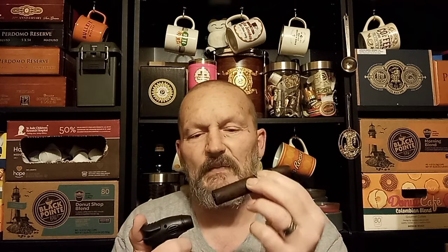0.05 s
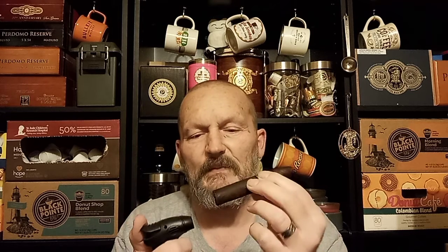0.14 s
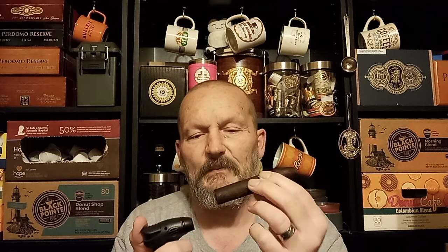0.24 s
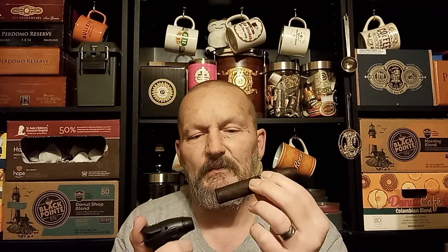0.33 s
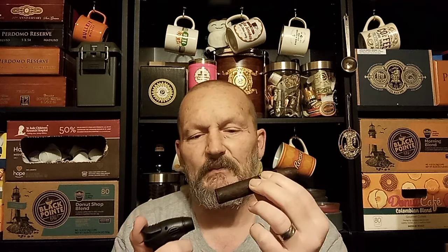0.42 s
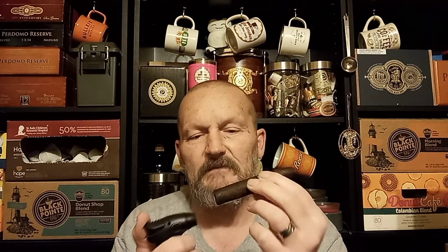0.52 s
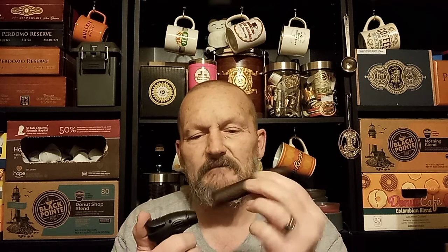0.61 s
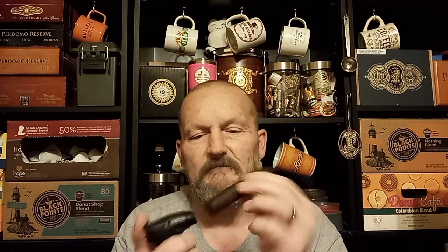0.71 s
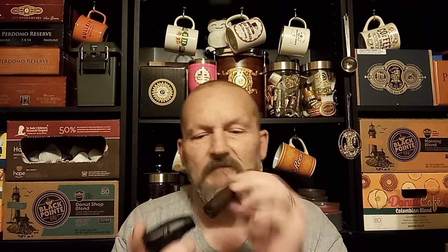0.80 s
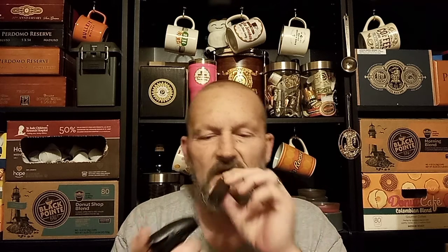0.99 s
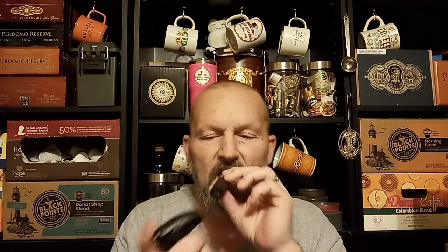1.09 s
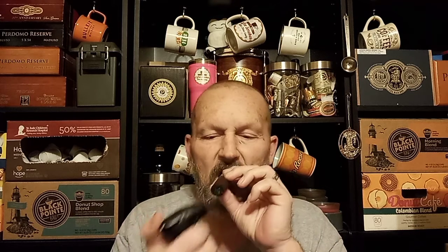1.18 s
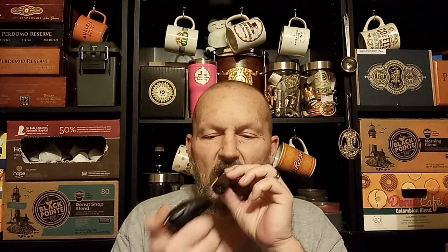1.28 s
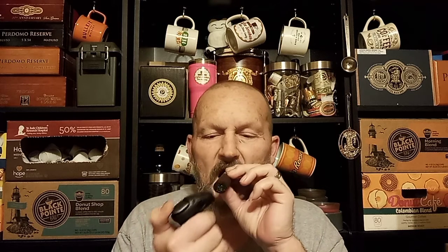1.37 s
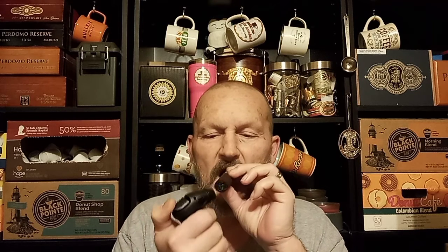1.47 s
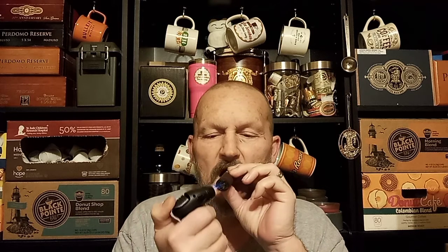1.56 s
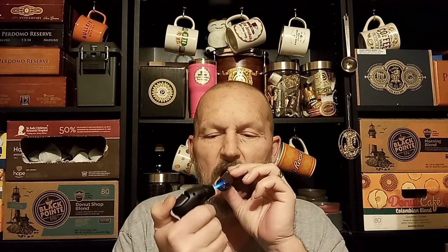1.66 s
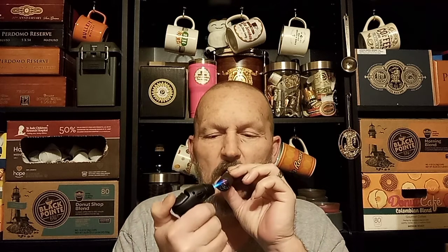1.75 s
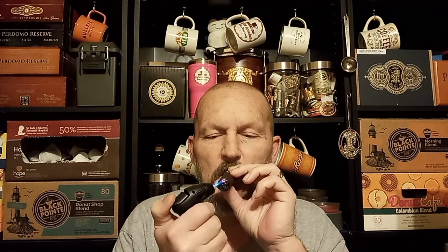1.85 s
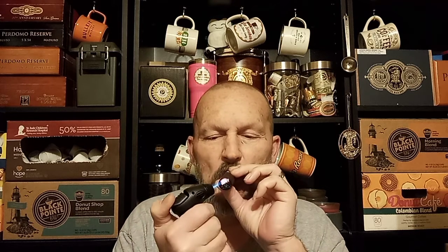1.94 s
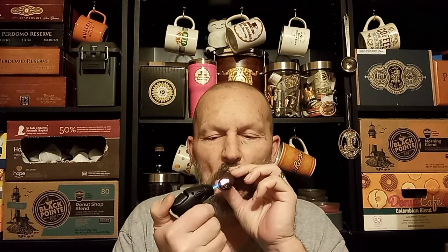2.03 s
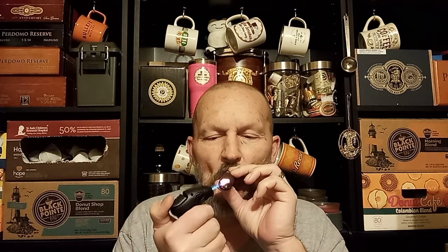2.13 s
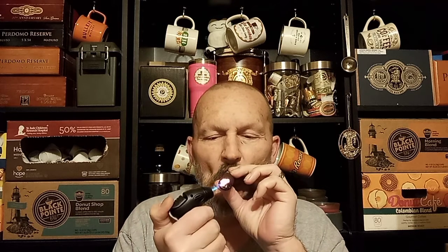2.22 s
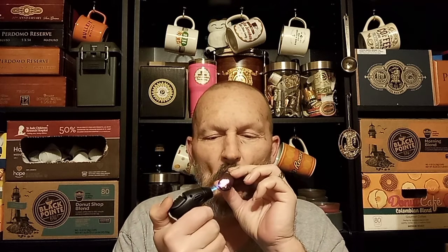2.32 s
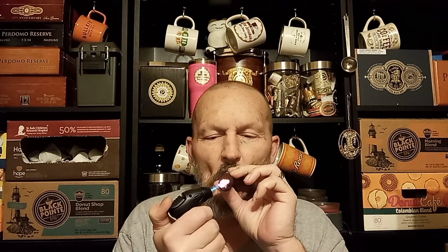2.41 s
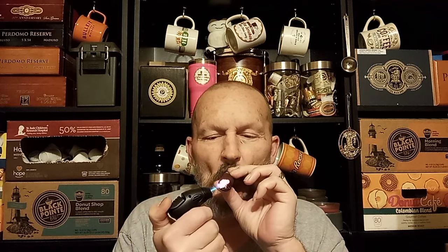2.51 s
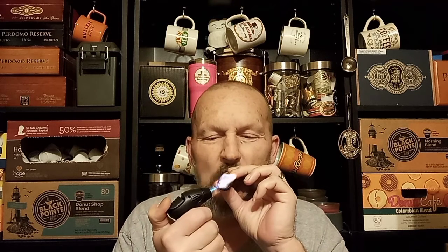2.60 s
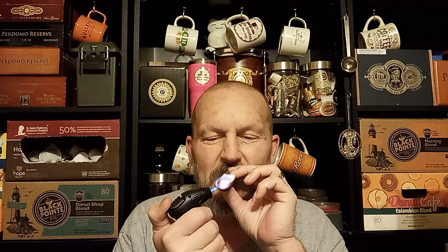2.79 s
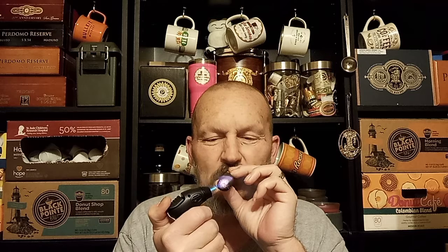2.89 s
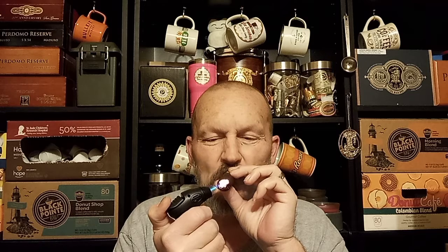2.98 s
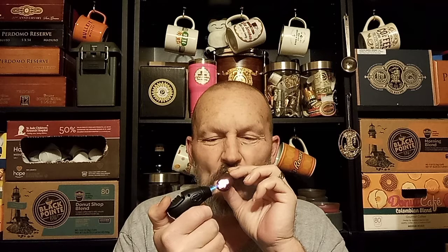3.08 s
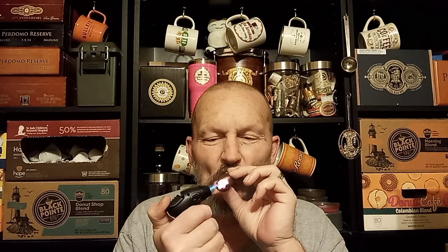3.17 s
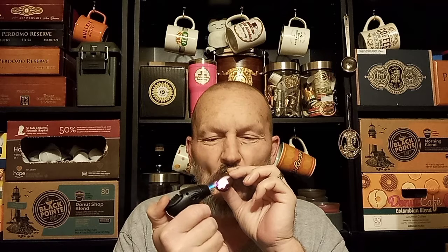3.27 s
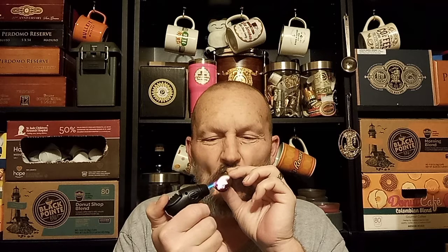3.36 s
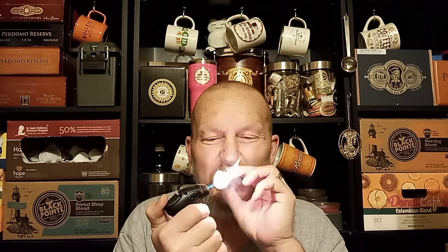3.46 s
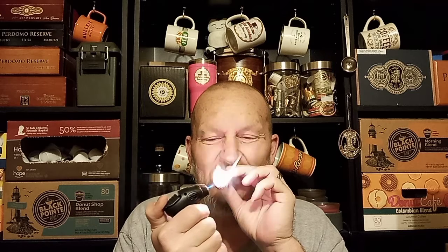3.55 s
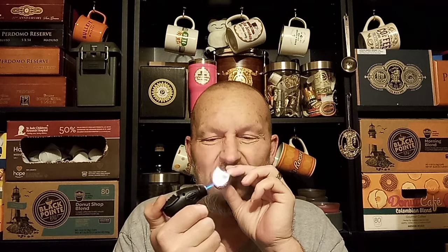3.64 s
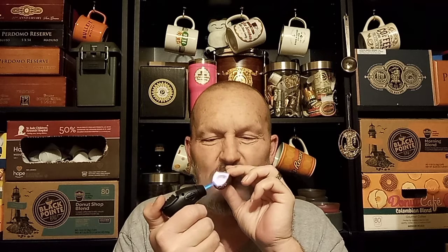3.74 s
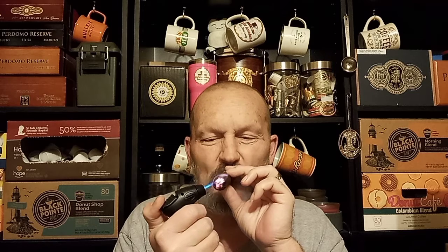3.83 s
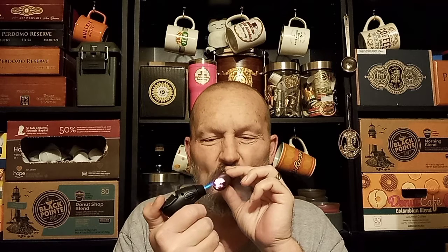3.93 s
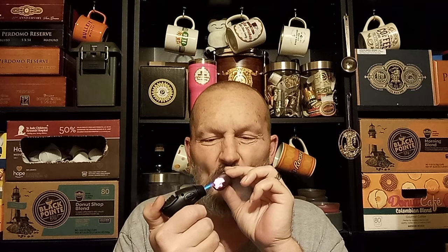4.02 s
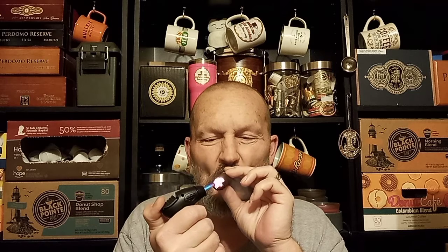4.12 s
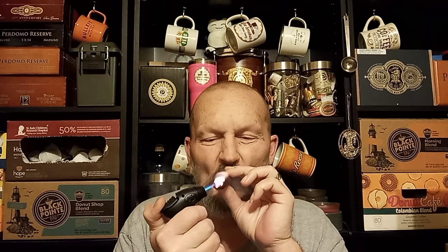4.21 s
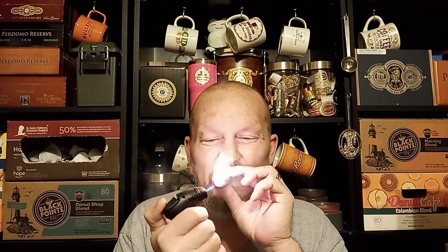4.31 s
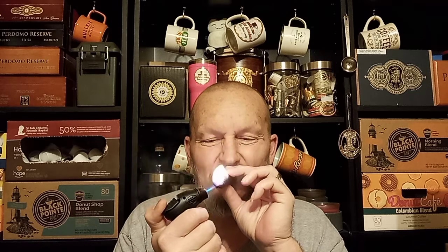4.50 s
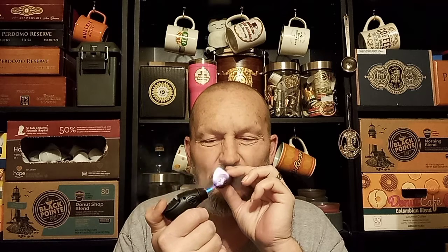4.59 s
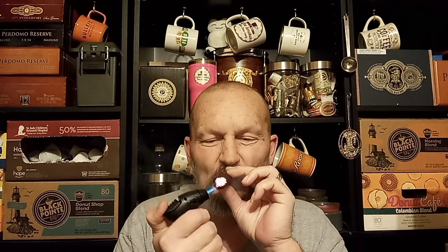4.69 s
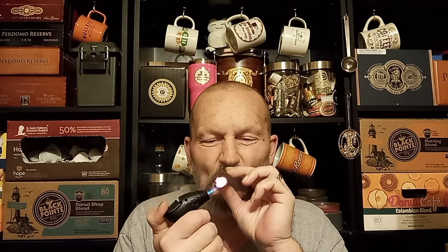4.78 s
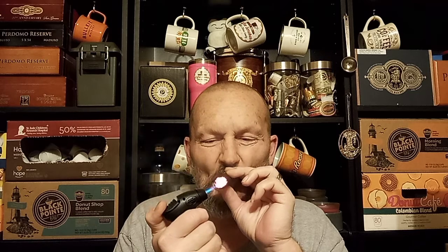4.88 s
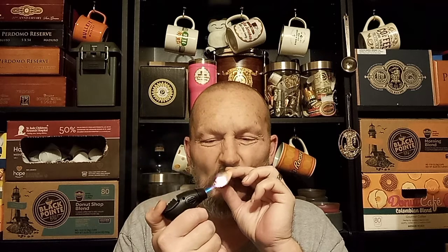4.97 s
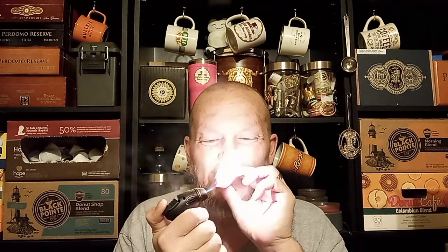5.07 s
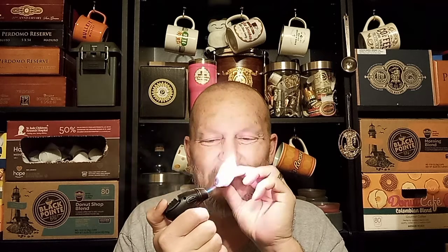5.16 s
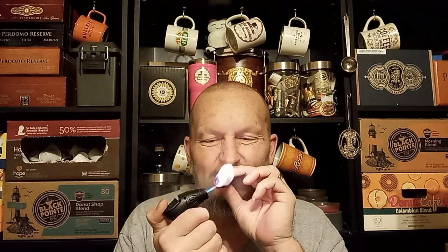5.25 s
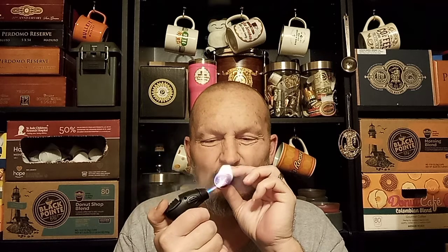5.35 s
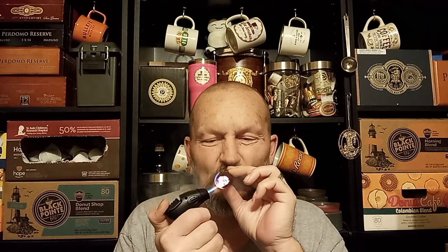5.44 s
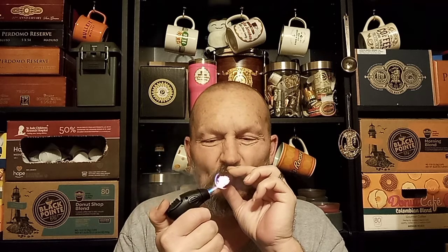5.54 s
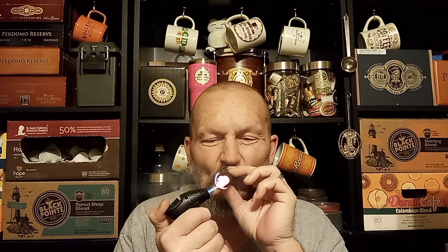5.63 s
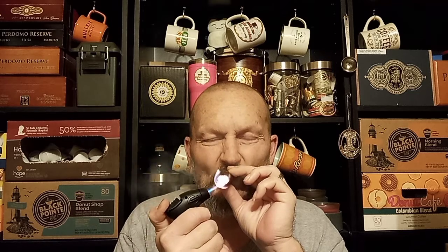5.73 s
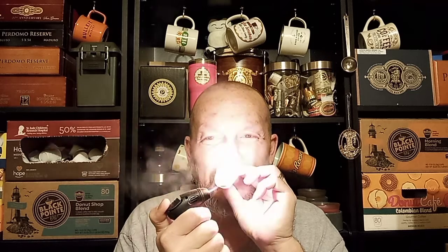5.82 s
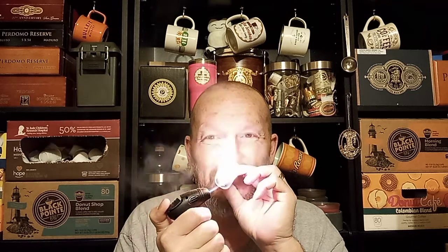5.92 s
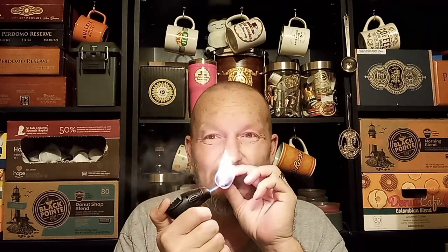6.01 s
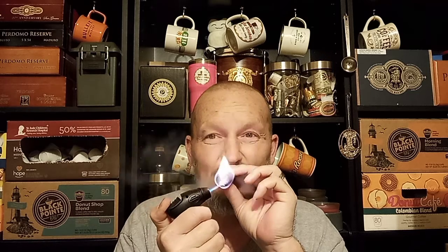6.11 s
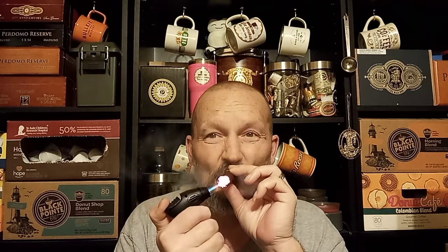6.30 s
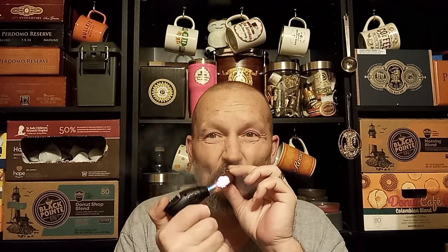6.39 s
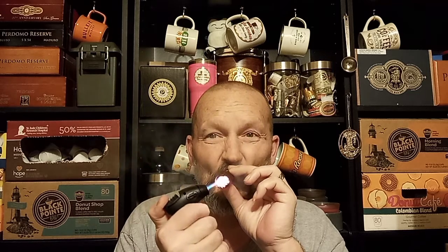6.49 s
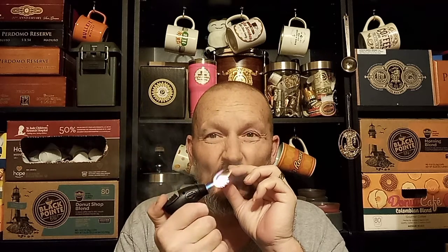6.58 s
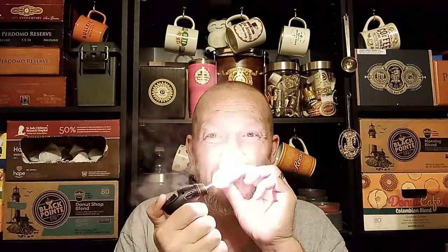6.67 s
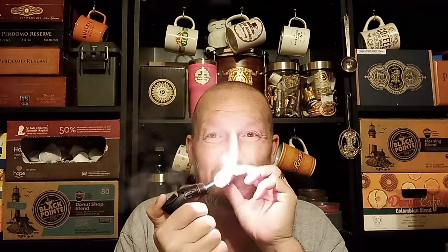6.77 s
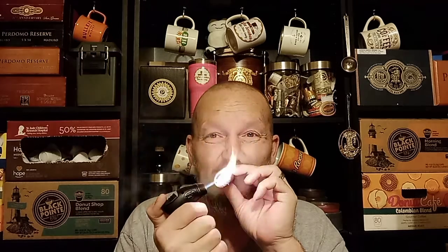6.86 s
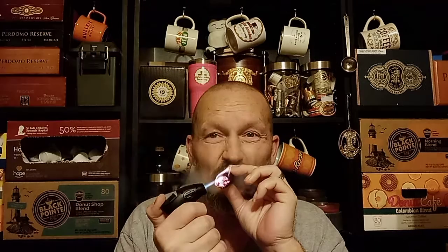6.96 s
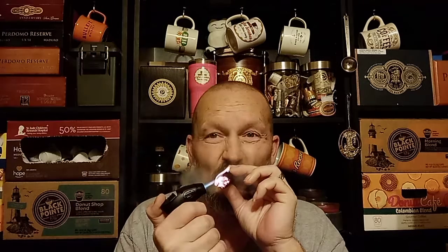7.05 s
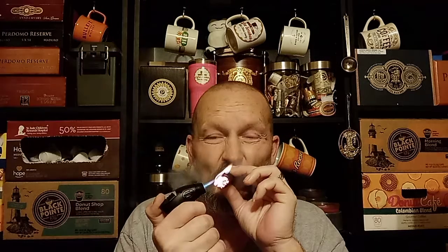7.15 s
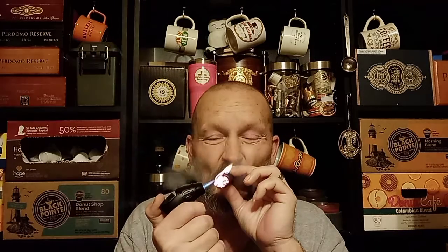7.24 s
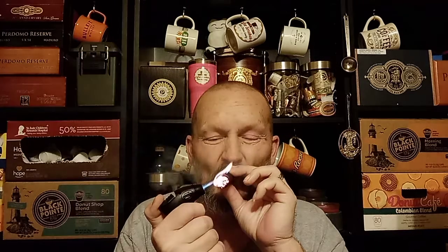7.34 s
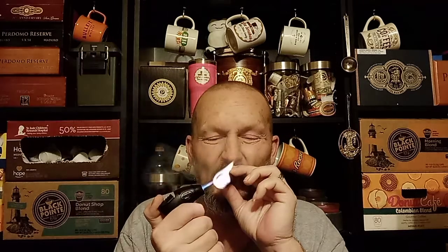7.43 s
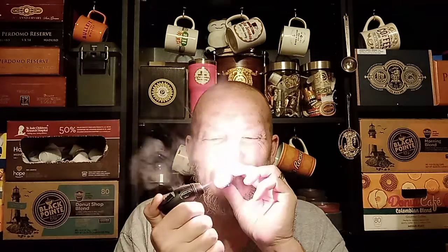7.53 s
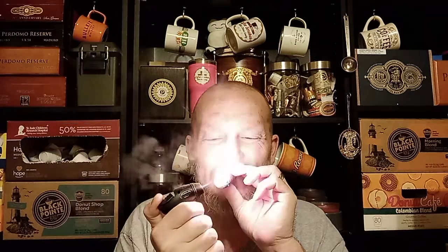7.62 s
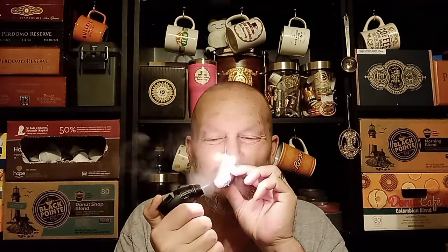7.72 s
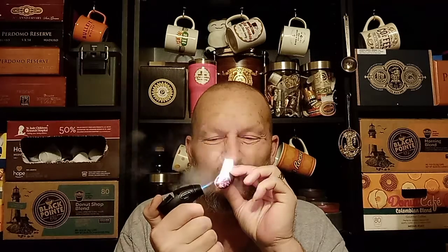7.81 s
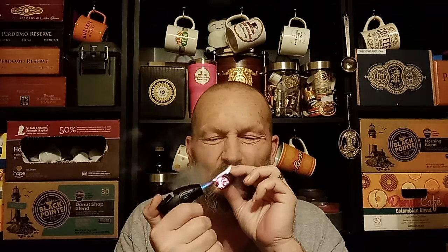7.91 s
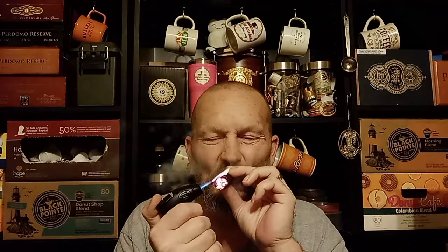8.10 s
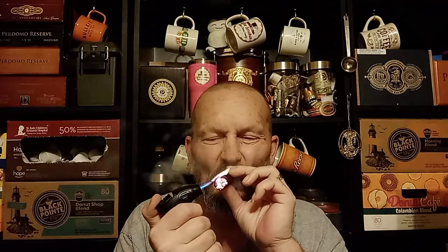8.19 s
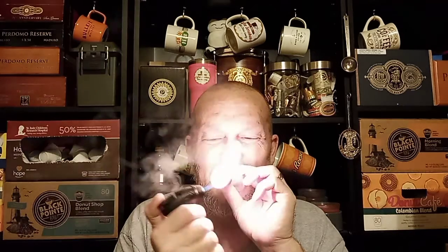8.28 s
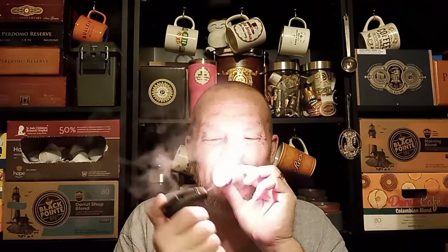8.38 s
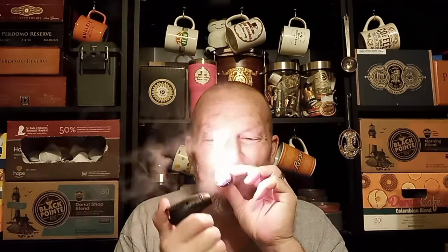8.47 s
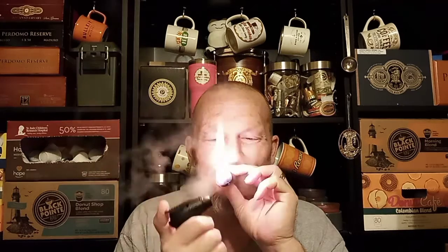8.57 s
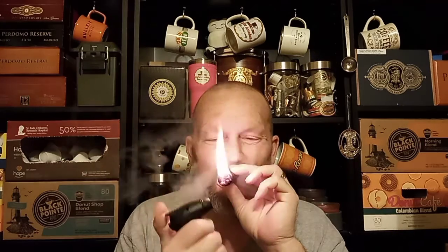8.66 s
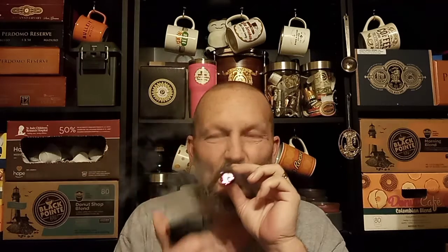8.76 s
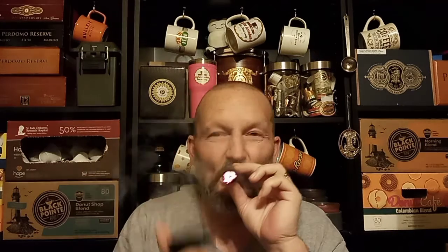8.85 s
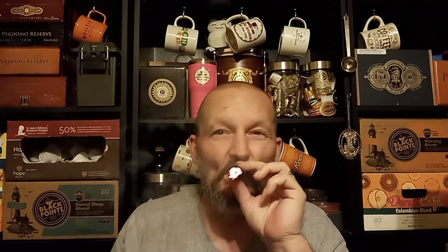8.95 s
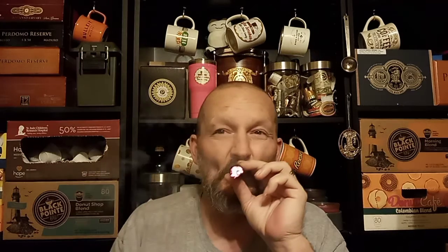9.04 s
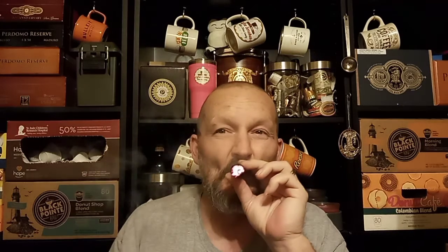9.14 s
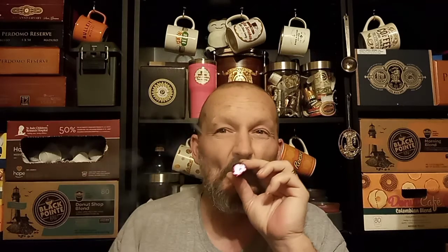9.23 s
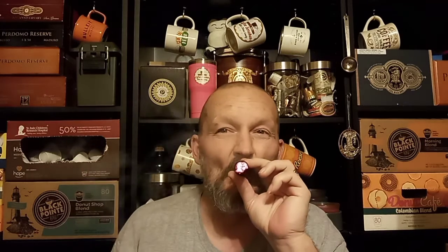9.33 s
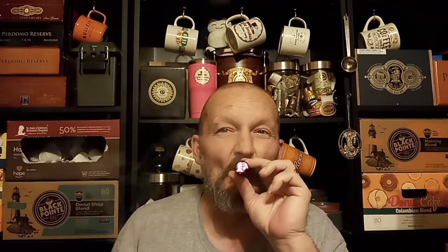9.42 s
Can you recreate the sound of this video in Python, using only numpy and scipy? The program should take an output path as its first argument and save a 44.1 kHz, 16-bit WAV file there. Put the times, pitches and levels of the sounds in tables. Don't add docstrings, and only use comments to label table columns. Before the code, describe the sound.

A small, quiet room, heard close through a small microphone with peaky treble. Throughout, a soft fan murmur and faint low street rumble sit under dry, bright ticks, several per second, irregularly skipping beats. Near 0.1 s there is a crackle, dull hand knock and soft sleeve rustle; tiny snaps follow around 0.8 s. From about 1.15 s unlit gas hisses faintly, then at 1.46 s the spark striker snaps very loudly, with a short metallic rattle and ring. The jet flame hisses from 1.5 to 8.3 s, bright and turbulent with some low roar, swelling around 3.6 to 5 s, dipping near 6.7 s, strongest around 7.8 to 8.1 s. Sparse dry crackles break through it, sharper at 6.5 and 8.1 s. Around 8.3 to 8.4 s the valve shuts with a brief vent and lever click. Faint spring clicks come at 9.1 s, a small lid knock at 9.25 s, and low thuds at the end.

```python
import sys
import numpy as np
from scipy import signal
from scipy.fft import rfft, irfft
from scipy.io import wavfile
from scipy.ndimage import uniform_filter1d, minimum_filter1d

SR = 44100
rng = np.random.default_rng(int(sys.argv[2]) if len(sys.argv) > 2 else 0)


def to_wav(s):
    ch = np.atleast_2d(s).T
    pcm = np.round(np.clip(ch, -1, 1) * 32767)
    wavfile.write(sys.argv[1], SR, pcm.astype(np.int16))


def elevation(decibels):
    levels = np.asarray(decibels, float)
    return 10 ** (levels / 20)


N = 418950
EDGE_HZ, FLAT_HZ = 15800, 15150


def evened(x):
    return x / np.sqrt(np.mean(x ** 2) + 1e-20)


def read(points, hz):
    f, value = np.transpose(points)
    return np.interp(np.log(hz + 1), np.log(f + 1), value)


def bumps(rows, hz):
    return sum(db * np.exp(-((hz - f) / width) ** 2) for f, width, db in rows)


def add(mix, s, sound):
    part = mix[round(s * SR):][:len(sound)]
    part += sound[:len(part)]


def ring(hz, db, t60, phase, rise_s, size):
    t = np.arange(size) / SR
    decay = elevation(db[:, None] - 60 * t / t60[:, None])
    modes = decay * np.sin(2 * np.pi * (hz[:, None] * t + phase[:, None]))
    return modes.sum(0) * np.sin(np.pi / 2 * np.minimum(t / rise_s, 1)) ** 2


def colour(db):
    log_gain = np.log(elevation(np.r_[db, db[-2:0:-1]]))
    return np.fft.ifft(np.exp(log_gain - 1j * signal.hilbert(log_gain).imag)).real[:1024]


def air(gain, patchy_db, flicker_db):
    a, b, patches = rng.standard_normal((3,) + gain.shape)
    patches = evened(uniform_filter1d(uniform_filter1d(patches, size=5, axis=0), size=14, axis=1))
    flicker = evened(uniform_filter1d(rng.standard_normal(gain.shape[1]), size=5))
    z = (a + 1j * b) * gain * elevation(patchy_db * patches + flicker_db * flicker)
    z[round(EDGE_HZ / SR * 1024):] = 0
    return signal.istft(z, nperseg=1024, noverlap=768)[1][:N]


def steady_air(points, top_hz, patchy_db, flicker_db):
    hz = np.fft.rfftfreq(1024, 1 / SR)
    gain = elevation(read(points, np.minimum(hz, top_hz)))
    return evened(air(gain[:, None] * np.ones(N // 256 + 5), patchy_db, flicker_db))


def fuzzy(hz, width, size):
    pole = np.exp(-1.5 * np.pi * width / SR)
    drift = signal.lfilter([1], [1, -2 * pole, pole ** 2], rng.standard_normal((2, size)))
    turn = 2 * np.pi * hz * np.arange(size) / SR
    return evened(drift[0] * np.cos(turn) + drift[1] * np.sin(turn))


def wander(window):
    return evened(uniform_filter1d(uniform_filter1d(rng.standard_normal(N), size=window), size=window))


def self_noise():
    # f/Hz, density/dB per Hz
    noise_colour = [(1470, -45), (2500, -4), (2640, -43), (3460, -37), (4260, -27), (5370, 7), (5620, 4),
                    (6820, 0.5), (8520, -20), (10200, -24), (12900, -51), (14900, -28), (15800, -10)]
    return elevation(-75) * steady_air(noise_colour, FLAT_HZ, patchy_db=1.8, flicker_db=2.5)


def rumble():
    # t/s, level/dB
    thud_rows = [(.55, -79), (.74, -74), (1.106, -76), (1.47, -81), (5.13, -71), (6.43, -70), (6.9, -68),
                 (7.41, -70), (7.7, -70), (8.12, -70), (8.36, -63), (8.53, -78), (9.13, -64.5), (9.29, -58)]
    thud_s = 0.036
    t = np.arange(N) / SR
    thuds = sum(elevation(db) * np.exp(-((t - s) / thud_s) ** 2) for s, db in thud_rows)
    hum = elevation(-79.5 + 4.5 * wander(5000))
    return (hum + thuds) * elevation(-3.5) * fuzzy(88, 60.0, N)


def fan():
    # f/Hz, density/dB per Hz
    murmur = [(35, -55.5), (60, -24.5), (248, -4), (393, -3), (483, -2.5), (540, -2.5), (675, -13.5),
              (805, 0), (959, -1.5), (1300, -6), (1570, -12.5), (2300, -8), (2700, -32), (3510, -72),
              (5940, -120)]
    # f/Hz, width/Hz, level/dB
    housing = [(480.7, 35.7, -66.5), (594, 54, -71), (687.5, 28, -71.5), (259.7, 107, -70.5)]
    out = elevation(-64.5) * steady_air(murmur, SR / 2, patchy_db=2.2, flicker_db=1.6)
    swell = elevation(3.0 * wander(1500))
    return out + swell * sum(elevation(db) * fuzzy(tone_hz, width, N) for tone_hz, width, db in housing)


def band_db(x, lo, hi):
    hz = np.fft.rfftfreq(2048, 1 / SR)
    power = np.sum(abs(rfft(x[:210], 2048)[(hz > lo) & (hz < hi)]) ** 2)
    return 10 * np.log10(power / 1024 / 170 + 1e-20)


def ticks():
    # f/Hz, level/dB, t60/s
    tick_modes = [(5545, 1, 0.024), (6030, -3, .015), (6600, -3, 0.02)]
    # f/Hz, level at the touch/dB, level in its afterglow/dB
    tick_colour = [(2500, -51, -40), (3340, -17, -27), (4250, -34, -35), (4800, -17, -32), (5400, 0, -20),
                   (6200, 3, -21), (7170, -4, -23), (8200, -14, -34), (9460, -30, -31), (10860, -12, -20),
                   (13200, -42, -45), (14400, -4, -21), (15300, 4, -20), (16500, -15, -70),
                   (16900, -62, -90)]
    # t/s, level/dB, lift near 11 kHz/dB, lift near 15 kHz/dB
    early = [(0.0352, -43.0, 5, 1), (0.0744, -46, 4, 0), (0.1922, -42.5, -7, -8), (0.3099, -44, 6, 1),
             (0.4276, -42.5, -14, -13), (0.5061, -44, -12, -5), (0.5846, -42, -4, -20),
             (0.6631, -45, -7, -4), (0.7024, -41, -8, -7), (0.7416, -42, -8, -6), (0.8201, -47, 10, -11),
             (0.8593, -41.5, -13, -13), (0.9771, -42.5, -3, -22), (1.0163, -44, -4, -17),
             (1.0948, -43, 1, 1), (1.2126, -43.5, -1, -2), (1.3303, -45.5, 12, -8), (1.3695, -45, 8, -1),
             (1.6442, -45, 0, -14), (1.7227, -41.5, -5, -1), (1.8405, -52.4, -12, -7), (1.919, -43.5, 3, 1),
             (1.9974, -49, 0, -7), (2.0367, -47.5, 13, -5), (2.1937, -41, -5, -12), (2.3114, -44, 9, -13),
             (2.3899, -44, -5, -6), (2.4291, -45, 5, 1), (2.4684, -42.5, -8, -7), (2.5469, -42.5, -5, -19),
             (2.5861, -41, -6, -14), (2.6254, -43, -4, -3), (2.6646, -43, -4, -4), (2.7039, -43, -3, 0),
             (2.7431, -45, 9, -2), (2.8608, -47.6, -3, -9), (2.9001, -43.5, -3, -17), (2.9393, -44, 2, -11),
             (2.9786, -45, 8, 2), (3.0178, -54, -11, -17), (3.1356, -41, -7, -7), (3.214, -45, 9, -2),
             (3.2533, -45, 2, -15), (3.371, -43.2, -2, 1)]
    middle = [(3.488, -45.5, -4, -13), (3.528, -50, 17, 0), (3.6457, -51, -2, -11), (3.724, -42.5, -7, -11),
              (3.7635, -47.9, 15, -2), (3.8027, -47, 2, -7), (3.921, -42.5, -1, -4), (4.1559, -43, -7, -3),
              (4.1952, -46, 0, -16), (4.2344, -51, 14, -2), (4.3135, -45, 13, -8), (4.431, -46, 1, 0),
              (4.47, -40, -6, -16), (4.5876, -45.5, 9, -17), (4.706, -41, -9, -9), (4.745, -45, 8, 1),
              (4.784, -50, -7, -17), (4.8231, -48.5, 13, -4), (4.8623, -55, -1, -14), (4.902, -43, -4, -14),
              (4.9403, -43, -7, -9), (4.9806, -42.5, -6, -10), (5.02, -43.5, -6, -14),
              (5.0978, -50, -15, -17), (5.2155, -47.5, 3, -11), (5.294, -45, 8, -1), (5.3728, -44, -2, -22),
              (5.4125, -42, -5, -9), (5.5302, -43.5, -11, -6), (5.5696, -40.5, -7, -10),
              (5.6477, -41, 1, -22), (5.687, -42.5, -9, -8), (5.766, -44, -18, -11), (5.806, -41, -9, -3),
              (5.922, -44, -1, -1), (5.962, -42.5, -8, -6), (6.04, -47, 10, -8), (6.0789, -55, -9, -14),
              (6.1192, -45.5, 11, -4), (6.1967, -43, -9, -7), (6.2359, -44, 6, -3),
              (6.2755, -43.5, -6, -22), (6.432, -45, 1, -17), (6.5499, -46, -7, -15)]
    late = [(6.629, -42, -4, -22), (6.6676, -53, -9, -7), (6.7068, -44, -2, -8), (6.786, -47.5, -7, -20),
            (6.864, -48, -1, -9), (6.9037, -44, -8, -6), (6.943, -41, -8, -12), (6.9822, -42, 1, -1),
            (7.0607, -44, 0, -22), (7.2563, -42.5, -4, -2), (7.295, -42.5, -12, -7), (7.375, -48, -2, -13),
            (7.4133, -44.5, 0, -20), (7.4525, -47.3, 11, 0), (7.531, -44, -2, -1), (7.5705, -49, 13, -2),
            (7.688, -44, -3, -11), (7.7665, -49, -6, -20), (7.806, -41, -10, -7), (7.845, -45.3, 9, 0),
            (7.9234, -46, -6, 4), (7.9627, -44, 5, -1), (8.199, -44, 1, 3), (8.317, -43, -9, -4),
            (8.356, -43, 0, -13), (8.3935, -48, 1, -11), (8.4735, -41, -3, -2), (8.513, -44.1, 4, 4),
            (8.5915, -45.5, 5, 0), (8.6693, -48, -6, -18), (8.709, -42, -9, -16), (8.788, -43.5, -4, -18),
            (8.8272, -42.5, -11, -12), (8.866, -43.5, -16, -4), (8.9057, -42.5, -4, 0),
            (8.945, -42.5, -8, -7), (8.984, -46.5, -8, -23), (9.062, -51, -22, -22), (9.14, -43, 1, 2),
            (9.179, -47, -4, -16), (9.2578, -39, -12, -8), (9.298, -40.5, -4, -12), (9.337, -46.5, 8, 1),
            (9.4153, -44, 2, 2)]
    # low/Hz, high/Hz
    touch_bands = [(5000, 6300), (10000, 12000), (14200, 16500)]
    usual_db = np.array([-8.5, -28.5, -10.5])
    glow_follow = [0.53, 0.72]
    hz, t = np.fft.rfftfreq(2048, 1 / SR), np.arange(2048) / SR
    corner_hz, touch_db, glow_db = np.transpose(tick_colour)
    scratch = .2 * np.exp(-((t - .0019) / .0012) ** 2)
    knock = np.zeros(2048)
    knock[[38, 70, 102]] = 1.1, 1.9, 1.4
    reflections = 0.77 * np.exp(-((t - .006) / 0.00065) ** 2) + 0.82 * np.exp(-((t - .0175) / 0.0028) ** 2)
    glow = (t > .004) * elevation(-60 * t / 0.073) * (1 + reflections)
    rows = early + middle + late
    noise = rng.standard_normal((len(rows), 2, 2048))
    vary = rng.standard_normal((len(rows), len(tick_colour) + 2))
    upper = np.array([np.interp(hz, [8300, 9300, 12800, 13500], row) for row in ([0, 1, 1, 0], [0, 0, 0, 1])])
    out = np.zeros(N)
    for (s, level_db, *lift_db), (a, b), odd in zip(rows, noise, vary):
        touch_gain = elevation(read(np.c_[corner_hz, touch_db + .8 * odd[2:]], hz))
        glow_gain = elevation(read(np.c_[corner_hz, glow_db + .8 * odd[2:]], hz))
        front = 0.071 * evened(irfft(rfft(scratch * a + knock) * touch_gain))
        mode_hz, mode_db, t60 = np.transpose(tick_modes)
        mode_hz = mode_hz * (1 + .008 * odd[3:6])
        front += elevation(-13.5) * ring(mode_hz, mode_db, t60, 0.25 * odd[:3], rise_s=0.0011, size=2048)
        have_db = np.array([band_db(front, *band) for band in touch_bands])
        fix_db = usual_db + np.r_[0, lift_db] - have_db
        body = irfft(rfft(front) * elevation(fix_db[0] + (fix_db[1:] - fix_db[0]) @ upper))
        glow_lift_db = 2.0 * upper[1] + (glow_follow * np.array(lift_db)) @ upper
        body += elevation(14.5) * irfft(rfft(glow * b) * glow_gain * elevation(glow_lift_db))
        add(out, s - .0016, elevation(level_db) * body * np.hanning(4096)[2048:])
    return out


def snap(peak_db, tilt_db, length_s, depth):
    # f/Hz, level/dB
    treble = [(100, -78), (500, -57), (1600, -24), (2700, -20.5), (3500, -21), (3970, -15), (4450, -15.5),
              (6650, 1), (7500, -4), (8600, -27.5), (11300, -14), (13500, -26), (15300, -5), (16800, -67)]
    hz, t = np.fft.rfftfreq(2048, 1 / SR), np.arange(900) / SR
    burst = .13 * rng.standard_normal(900) * np.exp(-t / length_s) + (t == 0)
    tilt = tilt_db * np.log2((hz + 400) / 6500)
    sound = np.convolve(burst, colour(depth * read(treble, hz) + tilt))
    return elevation(peak_db) * sound / abs(sound).max()


def hands():
    # t/s, peak/dB, tilt/dB per octave, burst length/s
    crackles = [(0.086, -32, -1.5, 0.011), (0.752, -50, -10, 0.0025), (0.84, -46, -6, 0.0025),
                (1.1643, -47, 1, 0.0027), (2.497, -39, -3, 0.0025), (2.756, -36, -8, 0.0022),
                (3.287, -34, -10, 0.0027), (4.073, -35.5, -8, 0.0025), (4.265, -54, -4, 0.0025),
                (5.0045, -55, -1.5, 0.0025), (5.2214, -50, -3, 0.0025), (5.6265, -33.5, -5, 0.0025),
                (5.65, -34, -8, 0.0024), (5.752, -56, -3, 0.0025), (6.465, -30, -6, 0.0013),
                (8.129, -30, -8, 0.003), (8.398, -32.5, -7.5, 0.004), (9.089, -44, -2, 0.0008),
                (9.0926, -49, 1, 0.001), (9.245, -37, -7, 0.0025)]
    # t/s, peak/dB, f/Hz, t60/s
    knocks = [
        (.084, -42, 162, 0.037),
        (.084, -52, 278, 0.031),
        (1.456, -52, 133, 0.06),
        (1.456, -41.5, 450, 0.014),
    ]
    out = np.zeros(N)
    for s, *row in crackles:
        add(out, s, snap(*row, depth=.75))
    for s, db, hz, t60 in knocks:
        cluster_hz = hz * np.array([0.96, 2.0, 1.1, 1.0])
        cluster_db = db + np.array([4.0, 14.0, -13, -7])
        cluster_t60 = t60 * np.array([1.0, 0.29, 0.56, 0.43])
        add(out, s, ring(cluster_hz, cluster_db, cluster_t60, np.zeros(4), rise_s=0.0022, size=6000))
    return signal.lfilter(*signal.butter(2, 110, "high", fs=SR), out)


def lever():
    # centre t/s, level/dB, f/Hz, half length/ms
    chirps = [
        (1.4576, -9, 6640, 0.43),
        (1.457, -30, 1640, 0.78),
        (1.457, -38.5, 2400, .35),
        (8.3978, -38, 6300, .6),
        (8.4026, -39, 6100, 0.83),
        (8.4045, -45, 5900, .9),
        (9.0905, -42, 6500, 0.76),
        (9.0935, -43.5, 7030, 1.2),
        (9.0965, -52, 7000, 1.5),
    ]
    # t/s, f/Hz, level/dB, t60/s
    lever_modes = [
        (8.3968, 1587, -35, 0.029),
        (8.3968, 1485, -44, 0.084),
        (8.3968, 1524, -47, .06),
        (8.3968, 1350, -52, .04),
        (9.244, 720, -34.5, 0.02),
        (9.2445, 955, -49, .045),
        (9.247, 534, -58, .08),
        (9.25, 470, -52, .12),
        (9.255, 375, -57, .2),
        (9.26, 216, -53, 0.22),
    ]
    out, t = np.zeros(N), np.arange(-300, 300) / SR
    for s, db, hz, half_ms in chirps:
        add(out, s + t[0], elevation(db) * np.exp(-(1000 * t / half_ms) ** 2) * np.sin(2 * np.pi * hz * t))
    for s, *mode in lever_modes:
        add(out, s, ring(*np.c_[mode], np.zeros(1), rise_s=0.0011, size=9000))
    return out


def striker():
    # t/s, peak/dB
    strikes = [
        (1.4558, -6),
    ]
    # f/Hz, level/dB, t60/s
    body_modes = [(4380, -15, 0.056), (7100, 7, 0.1), (7550, 12, 0.1), (9000, 0, 0.06), (9900, -6, 0.06),
                  (11500, 1, 0.26), (14620, -14, 0.092), (15270, -14, 0.19)]
    # f/Hz, width/Hz, level under the snap/dB
    cap_tones = [(3360, 120, -42), (3750, 50, -39), (3930, 130, -29), (4940, 330, -56), (5450, 210, -35)]
    out, (s, peak_db) = np.zeros(N), strikes[0]
    add(out, s, snap(peak_db - 18, 2.3, 0.0018, depth=0.6))
    add(out, s + 0.00055, snap(peak_db - 5.5, -0.36, 0.0011, depth=0.54))
    add(out, s + .004, snap(peak_db - 12, 0, 0.0013, depth=1.0))
    hz, db, t60 = np.transpose(body_modes)
    t60 = np.minimum(t60, .09 * (7200 / hz) ** 2)
    body = ring(hz, db, t60, rng.random(len(hz)), rise_s=0.00055, size=6000)
    add(out, s + 0.0008, elevation(peak_db - 36) * body)
    t = np.arange(5000) / SR
    rattle = sum(elevation(db) * fuzzy(f, width, 5000) for f, width, db in cap_tones)
    add(out, s + 0.001016, elevation(peak_db - 60 * t / 0.092) * rattle)
    return out


def puffs():
    # t/s, level/dB, f/Hz, width/Hz, length/ms
    puff_rows = [
        (8.3, -59, 6750, 350, 200.),
        (2.225, -60, 4430, 330, 95.),
        (.838, -54, 6800, 400, 12.),
        (.755, -63, 4900, 500, 18.),
        (1.053, -65, 7700, 200, 16.),
    ]
    out = np.zeros(N)
    for s, db, hz, width, length_ms in puff_rows:
        size = round(length_ms * SR / 1000)
        add(out, s, elevation(db) * fuzzy(hz, width, size) * signal.windows.tukey(size, .4))
    return out


def stroke(t, start, rise_s, hold_s, fall_s):
    fade_db = 14
    edges = np.cumsum([start, rise_s + .001, hold_s + .001, fall_s + .001])
    return np.interp(t, edges, [-fade_db, 0, 0, -fade_db], left=-200, right=-200)


def rush_levels(t):
    # t/s, strength/dB
    flame_points = [(1.5, -60), (1.63, -61.5), (1.95, -60.5), (2.2, -57.5), (2.67, -56.5), (3.14, -60.5),
                    (3.61, -54.5), (4.0, -54.5), (5.03, -55.5), (5.43, -59), (6.05, -57.5), (6.46, -60.5),
                    (6.74, -62), (7.3, -58), (7.75, -53), (8.11, -53.5), (8.262, -56.5)]
    parts_usual_db = [-57.5, -58.5, -84.5, -65]
    follow = [0.55, 0.85, 0.57, 0.076]
    quiet_db = [-75, -75.5, -100, -91]
    # start t/s, rise/s, hold/s, fall/s, level/dB
    cold_gas = [
        (1.154, 0.024, 0.26, .03, -63.5),
    ]
    flare = [
        (1.46, 0.03, .012, 0.05, -57),
    ]
    sleeves = [
        (.05, 0.029, 0.13, 0.13, -67.5),
        (8.85, 0.053, 0.033, 0.097, -75),
    ]
    vents = [
        (8.29, 0.029, 0.085, 0.089, -60.5),
        (8.95, 0.039, 0.023, 0.061, -72),
        (0.98, 0.054, .015, .05, -71),
    ]
    s, strength_db = np.transpose(flame_points)
    lit_db = stroke(t, s[0] - .03, .03, s[-1] - s[0], .03)
    change_db = np.interp(t, s, strength_db) + 58
    flame_db = np.c_[parts_usual_db] + np.c_[follow] * change_db + lit_db
    power = elevation(np.c_[quiet_db]) ** 2 + elevation(flame_db) ** 2
    for parts_db, rows in (([-11, 0, -9.5, -10], cold_gas), ([-35, 15, 0, -8], flare),
                           ([-1.5, 6, -9, -1], sleeves), ([-8, 3.5, -28, -18], vents)):
        for *shape, db in rows:
            power = power + elevation(np.c_[parts_db] + db + stroke(t, *shape)) ** 2
    return 10 * np.log10(power)


def rush():
    # f/Hz, density/dB per Hz
    jet_colour = [(180, -46), (300, -17), (385, -24.5), (493, -18.5), (1020, -16.5), (2310, -10),
                  (2720, -11.5), (3210, -14), (3860, -15.5), (6450, 19), (7130, 14), (8550, -25.5),
                  (12500, -16), (15000, -0.5), (15800, 0)]
    # f/Hz, width/Hz, depth/dB
    dips = [(1400, 110, -4), (1780, 70, -4), (2160, 70, -5), (2580, 80, -7), (2790, 90, -8), (2960, 90, -8),
            (3800, 200, -6), (4310, 110, -8), (6130, 80, -5), (13750, 350, -5)]
    # low/Hz, high/Hz
    part_bands = [(1200, 4500), (6300, 8000), (9500, 11500), (13000, 15800)]
    # t/s, depth (1 = usual)
    shade = [(1.6, 1.8), (2.3, 1.1), (3.1, 1.1), (4.2, 1.3), (5.2, 1.1), (5.52, 1.4), (5.66, 0.56),
             (5.78, 1.3), (5.9, 1.3), (6.2, 0.45), (6.4, 2.3), (6.47, 0.72), (6.56, 2), (6.9, 1.9),
             (7.1, 0.93), (7.55, 1.2), (8.15, 0.89)]
    hz, t = np.fft.rfftfreq(1024, 1 / SR), np.arange(N // 256 + 5) * 256 / SR
    dips_db = bumps(dips, hz)
    shape = elevation(read(jet_colour, np.minimum(hz, FLAT_HZ)) + dips_db)
    lifts_db = np.array([db - 10 * np.log10(np.sum(shape[(hz > lo) & (hz < hi)] ** 2))
                         for db, (lo, hi) in zip(rush_levels(t), part_bands)])
    corners_hz = [3855, 5370, 7800, 8700, 10700, 12900]
    corner_parts = np.eye(4)[:, [0, 1, 1, 2, 2, 3]]
    shares = np.array([np.interp(hz, corners_hz, row) for row in corner_parts])
    extra_depth = np.interp(t, *np.transpose(shade)) - 1
    shade_db = np.outer(dips_db * (abs(hz - 3500) < 1000), extra_depth)
    gain = shape[:, None] * elevation(shares.T @ lifts_db + shade_db)
    return air(gain, patchy_db=1.44, flicker_db=1.0) + puffs()


def combed(jet):
    # f/Hz, width/Hz, level/dB
    comb_rows = [(1220, 21, -5.5), (1486, 25, 7), (1535, 15, -5.5), (1603, 32, 5), (1863, 21, 5.5),
                 (1930, 28, -4.5), (1967, 26, 2.5), (2200, 30, -3.5), (2365, 39, 2), (2400, 18, -6),
                 (2560, 36, -11), (2700, 22, 5.5), (2780, 29, -8), (2890, 22, 9), (3120, 23, 3.5),
                 (4144, 25, 5), (4490, 23, 4), (4810, 40, 3.5), (5970, 30, 0), (6350, 47, -2.5),
                 (7260, 40, -9.5)]
    hz = np.fft.rfftfreq(N, 1 / SR)
    return irfft(rfft(jet) * elevation(0.44 + bumps(comb_rows, hz)), N)


def room(x):
    # f/Hz, t60/s
    decay = [(200, 0.11), (1500, 0.14), (4000, 0.14), (7000, 0.14), (15000, 0.15)]
    taps = np.zeros(SR // 2)
    at = np.arange(160, SR // 2 - 20, 20)
    taps[at + rng.integers(0, 20, len(at))] = rng.choice([-1., 1.], len(at))
    hz, t, z = signal.stft(taps, SR, nperseg=256)
    tail = signal.istft(z * elevation(-60 * t / read(decay, hz)[:, None]), SR, nperseg=256)[1]
    return signal.fftconvolve(x, tail / np.linalg.norm(tail))[:N]


def scene():
    background = fan() + rumble() + self_noise()
    tick, taps, strike, jet = ticks(), hands() + lever(), striker(), rush()
    hz = np.fft.rfftfreq(N, 1 / SR)
    hiss = irfft(rfft(jet) * (hz > 3300), N)
    wet = elevation(-8.5) * hiss + elevation(-1.5) * strike + elevation(-4.5) * taps + elevation(-12.0) * tick
    return (combed(jet) + strike + taps + tick + room(wet) + background)[None]


def masked(x):
    # low/Hz, high/Hz, limit against the hiss/dB, cut/dB
    weak_bands = [(8150, 8600, -30, -20), (8600, 9050, -30, -22), (9050, 9600, -30, -24),
                  (9600, 10200, -27, -20), (12200, 12800, -31, -14), (12800, 13900, -33, -16),
                  (15830, 22050, -18, -45)]
    hz, _, z = signal.stft(x, SR, nperseg=512, noverlap=384)
    power = uniform_filter1d(abs(z) ** 2, size=7, axis=1)
    hiss_power = power[(hz > 5000) & (hz < 8000)].mean(0)
    cover = minimum_filter1d(uniform_filter1d(hiss_power, size=6), size=16)
    for lo, hi, limit_db, cut_db in weak_bands:
        band = (hz > lo) & (hz <= hi)
        over_db = 10 * np.log10(power[band][:9].mean(0) / cover + 1e-12) - limit_db - 3
        z[band] *= elevation(cut_db * np.clip(-over_db / 2, 0, 1))
    return signal.istft(z, SR, nperseg=512, noverlap=384)[1][:N]


def low_pass(x):
    return signal.sosfilt(signal.butter(12, 17070, fs=SR, output="sos"), x)


def record(dry):
    x = signal.lfilter(*signal.butter(2, 65, "high", fs=SR), dry[0])
    power_db = 10 * np.log10(abs(uniform_filter1d(x ** 2, size=440)) + 1e-12)
    fall_db = np.arange(N) * 270.0 / SR
    held_db = np.maximum.accumulate(power_db + fall_db) - fall_db
    over_db = np.maximum(held_db + 40, 0)
    late_db = np.roll(uniform_filter1d(over_db, size=300), 600)
    low = signal.filtfilt(*signal.butter(2, 2600, fs=SR), x)
    x = x - low * (1 - elevation(-.95 * late_db))
    return low_pass(masked(x)[None])


dry = scene()
out = record(dry)
to_wav(out)
```